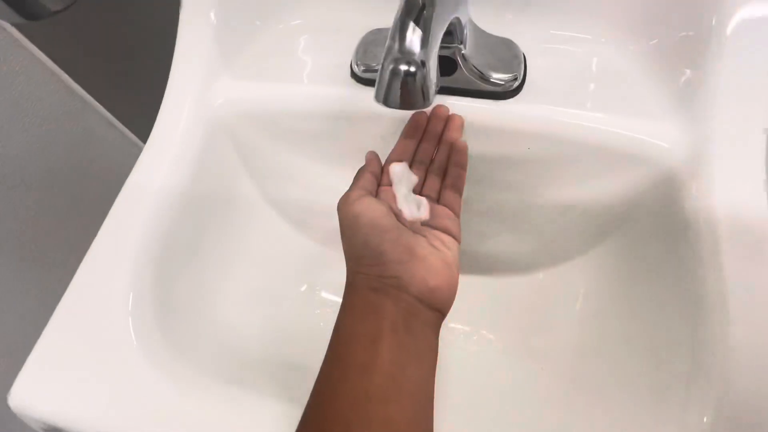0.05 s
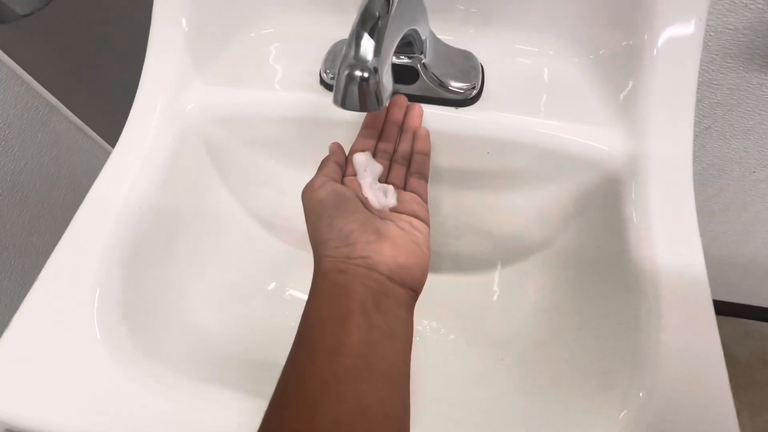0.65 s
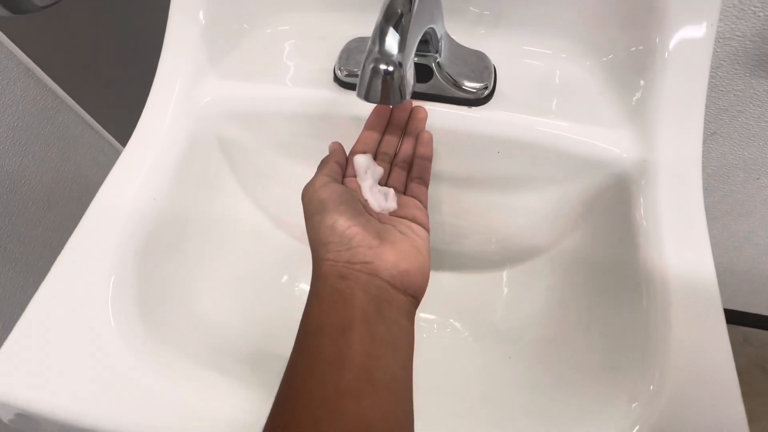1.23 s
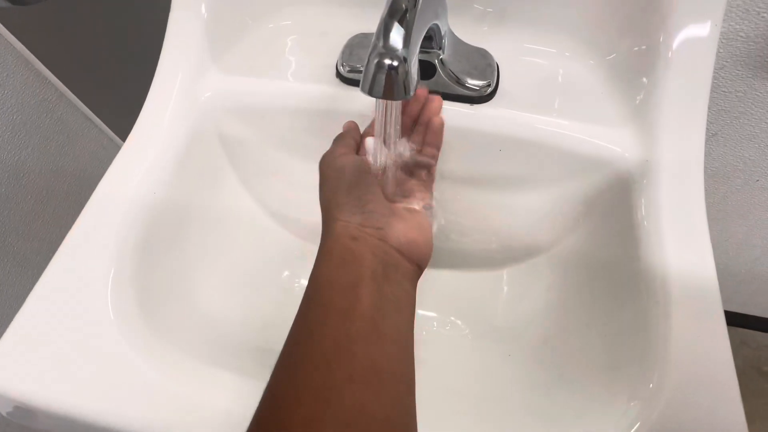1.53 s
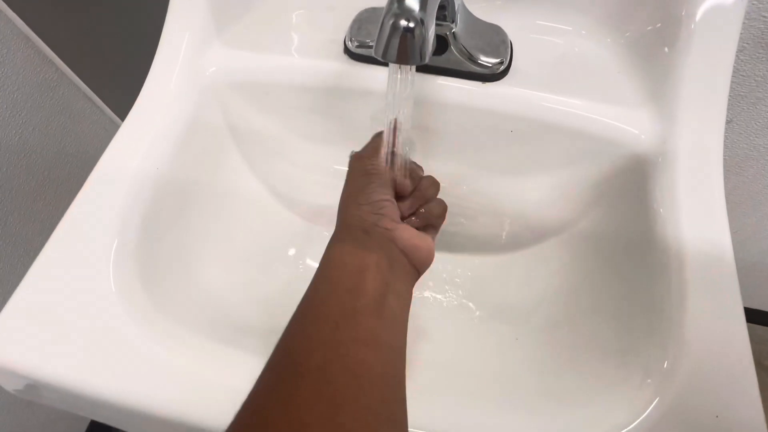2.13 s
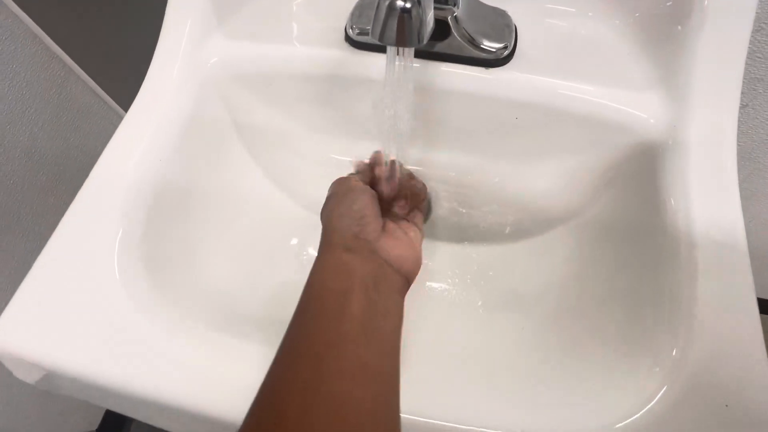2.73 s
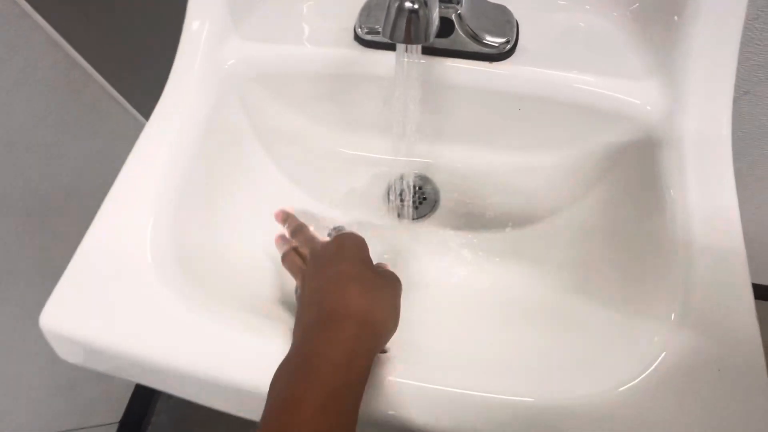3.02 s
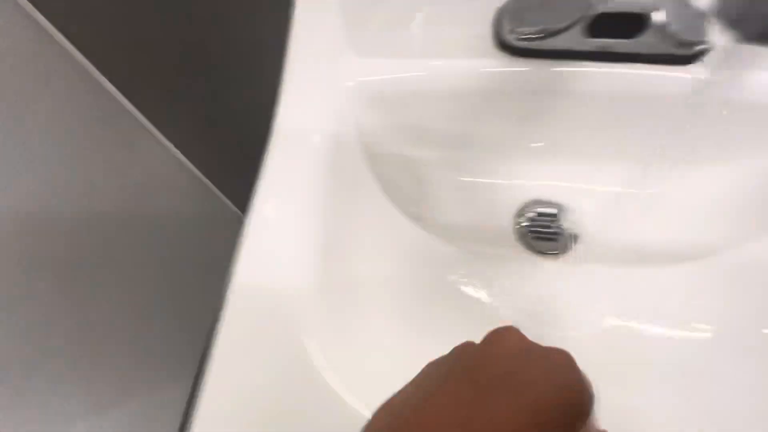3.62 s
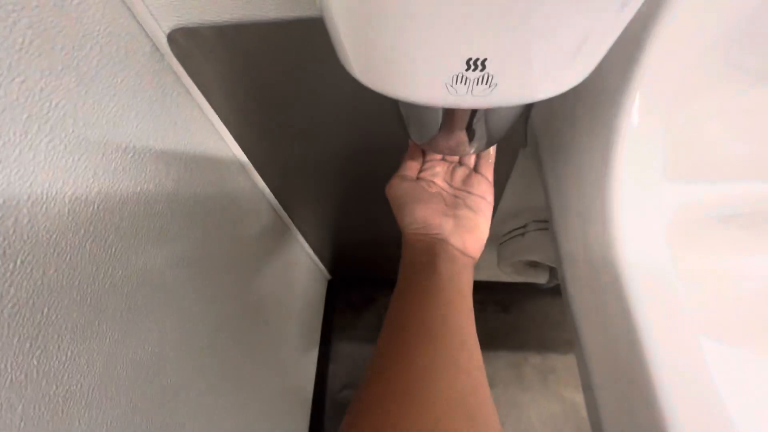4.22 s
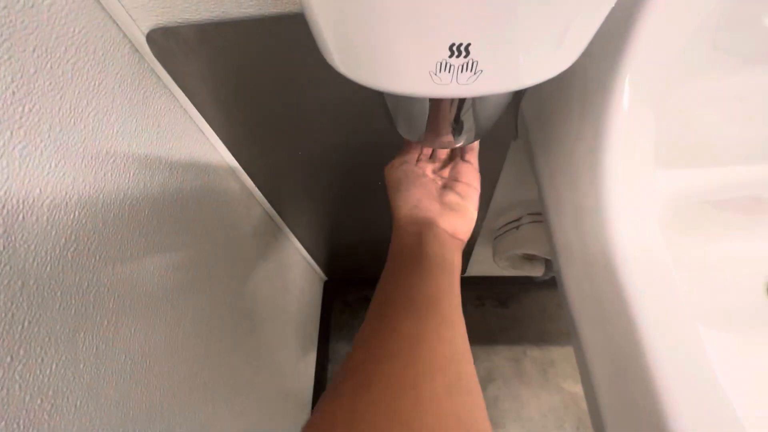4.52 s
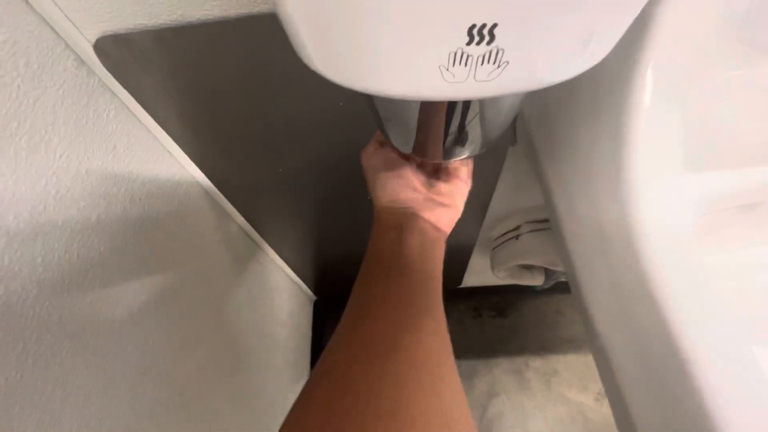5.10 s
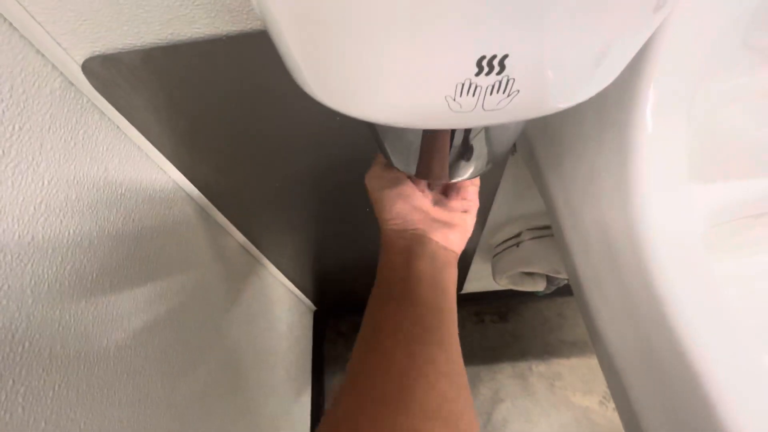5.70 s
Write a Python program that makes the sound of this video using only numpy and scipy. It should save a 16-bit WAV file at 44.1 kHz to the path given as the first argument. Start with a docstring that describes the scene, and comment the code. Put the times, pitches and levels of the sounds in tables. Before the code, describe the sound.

A tap spurts on and splashes over a hand into a sink, then a hand dryer starts with a thud and roars.

```python
"""Dull ventilation rumbles in a small washroom; a tap fizzes over a hand, then a hand dryer roars.
The sensor faucet opens with a spurt. Its aerated stream splashes and fizzes on skin and china,
drops ping and the drain gurgles until the valve shuts. The wall dryer starts with a jolt and a short
squeal; its motor hums, and its air jet buffets, hisses and sings in the hollow of the turning hand."""
import sys
import numpy as np
from scipy import signal
from scipy.fft import rfft, irfft, next_fast_len
from scipy.io import wavfile
from scipy.ndimage import uniform_filter1d

SR = 44100
rng = np.random.default_rng(int(sys.argv[2]) if len(sys.argv) > 2 else 0)


def store_wav(level_fs):
    """Save 16-bit WAV to argv[1]."""
    pcm = np.round(np.clip(np.atleast_2d(level_fs), -1, 1) * 32767)
    wavfile.write(sys.argv[1], SR, pcm.T.astype(np.int16))


N = 253575
TIME = np.arange(N) / SR
VALVE_OPEN_S, VALVE_SHUT_S, DRYER_ON_S = 1.277, 4.185, 4.333


def from_db(db):
    """Decibels to gain."""
    return 10 ** (np.asarray(db) / 20)


def rms_one(x):
    """Scale to rms 1."""
    return x / np.sqrt(np.mean(x ** 2) + 1e-20)


def rise(start, seconds):
    """A ramp from 0 to 1."""
    return np.clip((TIME - start) / seconds, 0, 1)


def fall(start, t60):
    """1 until the start, then dying away."""
    return np.exp(-np.log(1000) * np.clip((TIME - start) / t60, 0, 3))


def swell(middle, seconds):
    """A smooth bump of height 1, above half power for the given time."""
    return 2 ** (-2 * ((TIME - middle) / seconds) ** 2)


def in_time(rows):
    """Each column of an automation curve at every sample."""
    times, *columns = np.transpose(rows)
    return [np.interp(TIME, times, column) for column in columns]


def at_hz(points, hz):
    """Read a curve on a log-frequency axis."""
    point_hz, values = np.transpose(points)
    return np.interp(np.log(hz + 1e-9), np.log(point_hz), values)


def band(x, low_hz, high_hz, order=2):
    """Butterworth band-pass."""
    return signal.sosfilt(signal.butter(order, [low_hz, high_hz], "band", fs=SR, output="sos"), x)


def bell(x, hz, width_hz, db):
    """Lift or cut around one frequency."""
    return x + (from_db(db) - 1) * signal.lfilter(*signal.iirpeak(hz, hz / width_hz, fs=SR), x)


def drift(rate_hz):
    """A smooth random wobble with spread 1."""
    hop, run_in = 40, 2000
    pole = np.exp(-2 * np.pi * rate_hz * hop / SR)
    white = rng.standard_normal(N // hop + run_in + 2)
    slow = signal.lfilter([1], [1, -2 * pole, pole * pole], white)[run_in:]
    return np.interp(np.arange(N) / hop, np.arange(len(slow)), rms_one(slow))


def noise(spectrum, likeness):
    """Stereo noise at rms 1 from rows of (f/Hz, relative level/dB) and (f/Hz, left-right likeness)."""
    size = next_fast_len(N)
    hz = np.fft.rfftfreq(size, 1 / SR)
    mid, side = rfft(rng.standard_normal((2, size)))
    alike = at_hz(likeness, hz)
    both = np.sqrt(1 + alike) * mid + np.sqrt(1 - alike) * side * [[1], [-1]]
    return rms_one(irfft(both * from_db(at_hz(spectrum, hz)), size)[:, :N])


def blown(hz, width_hz):
    """A resonance, steady or moving, fed by turbulence; rms about 1."""
    phase = 2 * np.pi * np.cumsum(hz * np.ones(N)) / SR
    return drift(width_hz) * np.cos(phase) + drift(width_hz) * np.sin(phase)


def swirl(x, low_hz, high_hz, depth_db, rate_hz, count=11):
    """A flow that keeps changing shape: narrow bands swell and fade on their own; rms 1."""
    size = next_fast_len(N)
    spectrum, out = rfft(x, size), 0
    log_hz = np.log(np.fft.rfftfreq(size, 1 / SR) + 1)
    place = np.interp(log_hz, np.log([low_hz, high_hz]), [0, count - 1])
    for k in range(count):
        part = irfft(spectrum * np.maximum(1 - np.abs(place - k), 0), size)[..., :N]
        inside = 0 < k < count - 1   # the outer bands hold still
        out = out + part * from_db(depth_db * inside * np.clip(drift(rate_hz), -2, 2))
    return rms_one(out)


def ring(clicks, hz, t60):
    """A unit click sets a sine of height 1 ringing."""
    pole, step = from_db(-60 / (t60 * SR)), 2 * np.pi * hz / SR
    return signal.lfilter([0, np.sin(step)], [1, -2 * pole * np.cos(step), pole ** 2], clicks + 1e-18)


def room(x, t60=0.16):
    """Diffuse tail off the hard walls, different at each ear."""
    t = TIME[:SR // 2]
    tail = rng.standard_normal((2, len(t))) * np.exp(-np.log(1000) * t / t60) * (t > .003)
    tail /= np.sqrt(np.sum(tail ** 2) / 2)
    return signal.fftconvolve(np.atleast_2d(x), tail, axes=1)[:, :N]


def ventilation():
    """A dull steady rush keeps the room's modes sounding; the lowest throbs."""
    # tone of the rush: f/Hz, relative level/dB
    spectrum = [(25, -13.5), (45, -28), (63, -0.5), (90, -14), (150, -11.5), (310, -23), (450, -18.5),
                (800, -29), (1300, -33.5), (3300, -43.5), (5500, -45.5), (8000, -55), (11000, -67),
                (15000, -88)]
    # its stereo image: f/Hz, left-right likeness
    likeness = [(60, 0.7), (180, 0.76), (550, 0.088), (1650, -0.0), (4970, 0.00062), (15000, 0.11)]
    # room modes: f/Hz, width/Hz, level/dB
    modes = [(63.2, 2.9, -43), (117.3, 3, -54), (147, 9.2, -57), (212.3, 6.4, -55.5), (259.3, 13, -59),
             (416.5, 5.4, -59.5), (453, 4, -61.5), (541, 5.4, -60.5), (1230, 10, -69.5)]
    rush = from_db(-40) * noise(spectrum, likeness)
    return rush + sum(from_db(db) * blown(hz, width) for hz, width, db in modes)


def spurt():
    """The valve opens with a bright burst of water."""
    # tone of the burst: f/Hz, relative level/dB
    spectrum = [(600, -17), (1100, -4.5), (1600, -10.5), (2700, -12), (4200, -0.5), (6500, 0), (9000, -4),
                (12000, -14), (15500, -28)]
    envelope = rise(VALVE_OPEN_S, 0.0053) * fall(VALVE_OPEN_S, t60=0.28)
    return from_db(-23.5) * envelope * noise(spectrum, likeness=[(600, 0.31), (9000, 0.21)])


def fizz(per_s, low_hz, high_hz, cycles, spread_db, count=14):
    """Tiny bubbles burst at random times, pitches and pans; rms 1."""
    at = np.flatnonzero(rng.random(N) < per_s / SR)
    sizes = from_db(spread_db * np.minimum(rng.exponential(1, len(at)), 3.5))
    sizes *= rng.choice([-1, 1], len(at))
    pan = rng.normal(np.pi / 4, 1.0, len(at))
    pitch_slot = rng.integers(0, count, len(at))
    out = np.zeros((2, N))
    for k, hz in enumerate(np.geomspace(low_hz, high_hz, count)):
        clicks = np.zeros((2, N))
        clicks[:, at] = sizes * np.array([np.cos(pan), np.sin(pan)]) * (pitch_slot == k) * np.sqrt(hz)
        out += band(ring(clicks, hz, cycles / hz), hz / 1.134, hz * 1.05, order=1)   # softens the attack
    return rms_one(out)


def hand_in_stream():
    """Gains of spray and wash: the hand muffles the spray, and spills what it has caught."""
    # water the hand catches, the rest hits the china: t/s, share 0-1
    catch = [(1.4, 0.4), (1.75, 0.98), (2.82, 0.8), (3.17, .25), (3.6, 0)]
    # spills into the basin: middle t/s, spray level/dB, wash level/dB
    spills = [(1.46, -38.5, -45), (1.64, -42, -53), (1.94, -35.5, -46.5), (2.3, -33.5, -46),
              (2.68, -37.5, -55), (2.96, -31.5, -50)]
    caught, = in_time(catch)
    spilt_spray = sum(from_db(db) * swell(s, seconds=.08) for s, db, _ in spills)
    spilt_wash = sum(from_db(db) * swell(s, seconds=.08) for s, _, db in spills)
    spray_db, wash_db = -35 - 6.2 * caught, -50 + caught
    return np.hypot(from_db(spray_db), spilt_spray), np.hypot(from_db(wash_db), spilt_wash)


def stream(hiss):
    """Aerated water lands as a bright spray and a lower wash, each made of hiss and bubbles."""
    spray_gain, wash_gain = hand_in_stream()
    spray = from_db(-4) * rms_one(band(hiss, 3500, 14700))
    spray += from_db(-5.5) * fizz(2100, 5510, 11100, cycles=19, spread_db=3.5)
    wash = from_db(-0.5) * rms_one(band(hiss, 670, 4230))
    wash += from_db(-4) * fizz(450, 1700, 4100, cycles=47, spread_db=1.3)
    wash += from_db(-13) * blown(1830, 30)   # the bowl rings under the stream
    return spray_gain * from_db(1.62 * drift(25)) * spray + wash_gain * wash


def droplets(per_s=4):
    """Small drops fall unevenly while the water runs: t/s, level/dB, f/Hz, relative tick level/dB."""
    jitter, sizes, pitches = rng.standard_normal((60, 3)).T
    times = VALVE_OPEN_S + (np.arange(1, len(jitter) + 1) + .3 * jitter) / per_s
    return [(s, -35 + 1.4 * size, 8800 + 240 * pitch, -24)
            for s, size, pitch in zip(times, sizes, pitches) if s < VALVE_SHUT_S]


def plinks(rows, cycles, swell_cycles, glide):
    """Short tones swell, ring some cycles and glide up; rows of t/s, peak level/dB, f/Hz."""
    out, t = np.zeros(N), TIME[:SR // 20]
    for s, db, hz in rows:
        turns = hz * t
        shape = (1 - np.exp(-(turns / swell_cycles) ** 2)) * np.exp(-np.log(1000) * turns / cycles)
        bend = 1 + glide * (np.minimum(turns / cycles, 1) - .5)
        at = round(s * SR)
        out[at:at + len(t)] += from_db(db) * shape / shape.max() * np.sin(2 * np.pi * turns * bend)
    return out


def drops():
    """A drop hits the china with a short, high ping, a tick and a snap; large bubbles plink lower."""
    # the sharpest drops: t/s, level/dB, f/Hz, relative tick level/dB
    sharp_drops = [(1.5824, -32, 8530, -8), (2.0808, -24, 8550, -30), (2.4957, -30.5, 9040, -14),
                   (2.527, -23, 8140, -7), (2.7686, -24.5, 8150, -20), (3.0891, -25.5, 8870, -29),
                   (3.1765, -21.5, 9040, -27), (3.4703, -30, 8800, -18), (3.6735, -26, 8800, -24),
                   (3.696, -23, 8100, -21), (4.2106, -22, 8200, -8.5)]
    # large bubbles: t/s, level/dB, f/Hz
    bubbles = [(1.6501, -37, 2410), (2.4568, -37, 2150), (2.5216, -31, 2770), (2.595, -34, 2900),
               (2.7127, -35, 2940), (3.053, -34.5, 2990), (3.1328, -36, 3000), (3.2655, -33.5, 2910),
               (3.485, -34, 2950)]
    s, db, hz, tick_db = np.transpose(sharp_drops + droplets())
    pings = plinks(zip(s, db, hz), cycles=39, swell_cycles=9.1, glide=.12)
    ticks = plinks(zip(s + .0008, db + tick_db, 0.73 * hz), cycles=10, swell_cycles=5, glide=0.21)
    snaps = plinks(zip(s + .0014, db, 1.9 * hz), cycles=6.4, swell_cycles=1, glide=0)
    low_plinks = plinks(bubbles, cycles=86, swell_cycles=2.8, glide=0.04)
    return from_db(1.5) * pings + from_db(13) * ticks + from_db(-3) * snaps + from_db(-3.5) * low_plinks


def squelches(hiss):
    """Water splashes off the wet hand: a hollow slap with a puff of spray."""
    # splashes: t/s, slap level/dB, spray level/dB, t60/s
    hits = [(1.688, -42, -44, 0.084), (1.795, -47, -36.5, 0.083), (2.178, -34, -38.5, 0.15),
            (2.219, -57, -33.5, 0.04), (2.393, -46.5, -39, 0.094), (2.624, -37.5, -36, 0.07),
            (2.86, -52, -36, 0.057), (2.922, -46.5, -40.5, 0.14), (3.6, -46, -55, 0.55),
            (3.851, -32.5, -34, 0.098), (4.078, -41, -44.5, 0.41)]
    slap, spray = rms_one(band(hiss, 970, 1510)), rms_one(band(hiss, 2800, 5800))
    return sum(rise(s, 0.0011) * fall(s, t60) * (from_db(slap_db) * slap + from_db(spray_db) * spray)
               for s, slap_db, spray_db, t60 in hits)


def drain():
    """Water starts to run down the open drain, and the pipe rings as it fills."""
    # pipe modes: f/Hz, width/Hz, level/dB relative to the gurgle
    modes = [(440, 5.6, -7.5), (760, 28, -17.5)]
    gurgle = noise([(120, -16), (260, -1.5), (340, 4), (440, 3.5), (630, -4), (850, -11), (1400, -10.5),
                    (3000, -27), (6000, -49)], likeness=[(200, 0.66), (800, 0.069)])
    pipe = sum(from_db(db) * blown(hz, width) for hz, width, db in modes)
    return from_db(-44) * rise(3.39, seconds=0.34) * (gurgle + pipe)


def faucet():
    """The valve gates stream and drain; the splashes echo off the walls."""
    # tone of the splashing water: f/Hz, relative level/dB
    spectrum = [(1000, -3.5), (1450, -10), (1850, 0), (2300, 4), (3000, 1), (4200, 0.5), (6200, -4),
                (8000, -0.5), (10000, -5), (12000, -3.5), (15500, -7.5)]
    water = noise(spectrum, likeness=[(1000, 0.066), (8000, 0.044), (11000, 0.46)])
    hiss = swirl(water, 1750, 9200, depth_db=2.3, rate_hz=30)
    flow = rise(VALVE_OPEN_S, .004) * fall(VALVE_SHUT_S, t60=0.42)
    running = flow * (stream(hiss) + drain())
    splashes = (spurt() + squelches(hiss)) * from_db(1.9 * drift(120)) + drops()
    return running + splashes + from_db(-6) * room(splashes)


def motor_hum(hz=120):
    """The switch-on surge shakes the motor; its hum under load then settles to the running level."""
    surge = from_db(-13.5) * rise(DRYER_ON_S, 0.024) * fall(DRYER_ON_S + 0.039, t60=0.027)
    load = from_db(-30) + from_db(-19.5) * fall(DRYER_ON_S + 0.12, t60=0.71)
    current = surge + load * rise(DRYER_ON_S + 0.063, 0.027)   # the rotor starts to turn
    phase = 2 * np.pi * np.cumsum(hz * (1 + 0.0061 * drift(8.8))) / SR
    tone = np.sin(phase) + from_db(-7.5) * np.sin(2 * phase) + from_db(-19) * np.sin(3 * phase)
    return np.sqrt(2) * current * from_db(1.8 * drift(9)) * tone


def rotor_squeal(hz=1441, sharp_hz=59.9):
    """The starting rotor squeals sharp, sags to its pitch and chafes on there."""
    pitch = hz * (1 + 0.0034 * drift(40)) + sharp_hz * fall(DRYER_ON_S, t60=0.114)
    envelope = rise(DRYER_ON_S, 0.037) * fall(DRYER_ON_S + 0.07, t60=0.064)
    squeal = np.sqrt(2) * from_db(-12) * envelope * np.sin(2 * np.pi * np.cumsum(pitch) / SR)
    chafe = from_db(-24) * fall(DRYER_ON_S + .27, t60=.5) * blown(hz, width_hz=3.7)
    return squeal + from_db(-4) * room(squeal) + chafe


def housing_jolt():
    """The motor jolts its housing with a low thud."""
    thud = noise([(50, -26), (90, 2), (230, 4), (400, -10.5), (1200, -9.5), (2600, -28), (3700, -24.5),
                  (5500, -32), (9000, -39), (15000, -54)], likeness=[(100, 0.52), (2000, 0.14)])
    return from_db(-12.5) * fall(DRYER_ON_S, t60=0.43) * thud


def air_jet():
    """The air first buffets and roars, then hisses as the fan speeds up."""
    # the jet on the turning hand: t/s, roar level/dB, hiss level/dB
    levels = [(4.44, -17.5, -21), (4.5, -11, -15), (4.585, -9.5, -16.5), (4.65, -14.5, -16),
              (4.86, -12, -12.5), (4.93, -12, -11), (5.28, -14, -10), (5.45, -14, -13), (5.74, -15, -10)]
    # tone of the air: f/Hz, relative level/dB
    spectrum = [(45, -21), (80, -20), (150, -10.5), (450, -12.5), (720, -7.5), (1000, -1.5), (1250, -5.5),
                (1600, -5.5), (2050, -5), (3300, -4), (4000, -7), (5500, -4.5), (8300, -10), (11500, -19),
                (15500, -25)]
    # its stereo image: f/Hz, left-right likeness
    likeness = [(60, 0.62), (130, 0.8), (290, 0.45), (640, -0.4), (1410, 0.0045), (3100, -0.12),
                (6820, 0.12), (15000, 0.35)]
    # narrow resonances of fan, nozzle and housing: f/Hz, width/Hz, level/dB
    whistle_modes = [(398, 4, -35), (508, 8, -38), (648, 8, -32), (893, 5, -38), (1047, 5, -36),
                     (1301, 4, -36), (1480, 6, -35), (1546, 4, -30), (1665, 8, -35), (2203, 5, -33),
                     (2318, 10, -33), (2514, 7, -33)]
    # broad resonances of the nozzle: f/Hz, width/Hz, level/dB
    nozzle_modes = [(997, 120, -34), (1590, 39, -27.5), (3380, 64, -29.5)]
    roar_db, hiss_db = in_time(levels)
    palm_db = 4 * (1 - rise(4.51, 0.047))   # the flat palm buffets more until it turns away
    buffet_db = -8 + 0.99 * roar_db + palm_db
    air = swirl(noise(spectrum, likeness), 610, 9300, depth_db=1.4, rate_hz=6.3)
    buffet = from_db(buffet_db + drift(17)) * rms_one(band(air, 69, 614, order=3))
    midrange = rms_one(band(noise(spectrum, likeness), 675, 2100, order=3))
    roar = from_db(roar_db - 2 + 0.59 * drift(27)) * midrange
    hiss = from_db(hiss_db + 1.5 + .5 * drift(29)) * rms_one(band(air, 2680, 15800, order=3))
    hollow = cupped_hand()
    whistles = sum(from_db(db - 0.5) * (blown(hz, width) + 0.48 * blown(hz, width) * [[1], [-1]])
                   for hz, width, db in whistle_modes)
    nozzle = sum(from_db(db + drift(4.4)) * np.array([blown(hz, width), blown(hz, width)])
                 for hz, width, db in nozzle_modes)
    speed = rise(DRYER_ON_S, 0.1)
    rush = speed ** 2 * (buffet + roar + hollow) + speed ** 4 * (hiss + nozzle)
    walls = band(room(rush), 450, 2800)   # echoes put a fine ripple in the spectrum
    return from_db(-0.5) * (rush + .5 * walls) + speed ** 2 * whistles


def cupped_hand(half_open_hz=2380, half_open_db=-23):
    """The hand's hollow sings a moving vowel in the jet: each cupping pulls it to its own pitch."""
    # cuppings: middle t/s, length/s, f/Hz, level/dB
    cups = [(4.635, .04, 2240, -16.5), (4.955, .045, 2716, -15.5), (4.994, 0.036, 2323, -12.5),
            (5.099, 0.076, 2432, -14), (5.577, 0.0218, 2466, -9.5), (5.66, .13, 2380, -16)]
    shapes = [(half_open_hz, from_db(half_open_db) ** 2)]
    shapes += [(hz, (from_db(db) * swell(s, length)) ** 2) for s, length, hz, db in cups]
    power = sum(weight for _, weight in shapes)
    pitch = sum(hz * weight for hz, weight in shapes) / power
    pitch += 60 * drift(7.3)   # the fingers never keep quite still
    vowel = rms_one(blown(pitch, 150) + 1.4 * np.array([blown(pitch, 260), blown(pitch, 240)]))
    curl = rise(4.545, seconds=0.079)
    return np.sqrt(power) * curl * vowel


def gain_control(x, knee_db=-26, share=0.57, lag_s=0.67):
    """Slowly turns the level down while the sound stays loud."""
    power = np.abs(uniform_filter1d(np.mean(x ** 2, axis=0), size=1024))
    excess_db = np.maximum(10 * np.log10(power + 1e-12) - knee_db, 0)
    pole = np.exp(-1 / (lag_s * SR))
    return x * from_db(-signal.lfilter([1 - pole], [1, -pole], share * excess_db))


def scene():
    """Over the ventilation, the faucet runs and then the dryer starts."""
    washroom = ventilation() + faucet()
    motor = rise(DRYER_ON_S, 0.0097) * (motor_hum() + rotor_squeal() + housing_jolt())
    return washroom + motor + air_jet()


def record(dry):
    """Microphone colour, gain control, two treble notches, rounded peaks and a top cut."""
    left = bell(dry[0], 1090, 570, db=0.5)
    right = bell(dry[1], 930, 500, db=-6)
    right = bell(right, 3270, 600, db=-4.5)
    right = bell(right, 5770, 3700, db=-7)
    right = bell(right, 8700, 800, db=12)   # the right microphone port resonates
    both = gain_control(np.array([left, right]))
    both = bell(both, 10360, 890, db=-34)
    both = signal.sosfilt(signal.butter(3, [12500, 14500], "bandstop", fs=SR, output="sos"), both)
    both = both / (1 + (np.abs(both) / .95) ** 8) ** (1 / 8)   # soft clip
    return signal.sosfilt(signal.ellip(10, .1, 80, 16000, fs=SR, output="sos"), both)


dry = scene()
out = record(dry)
store_wav(out)
```